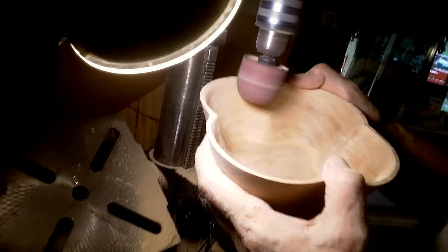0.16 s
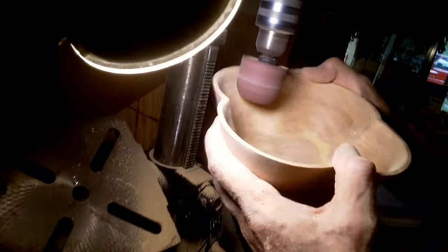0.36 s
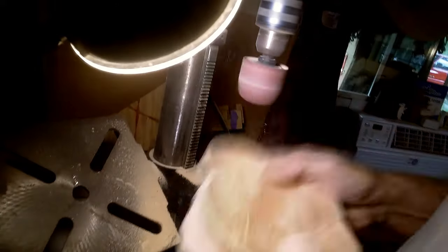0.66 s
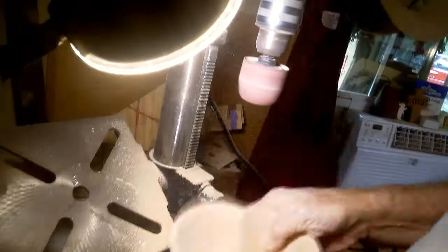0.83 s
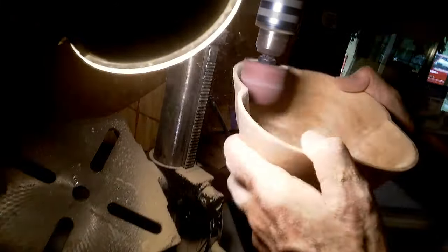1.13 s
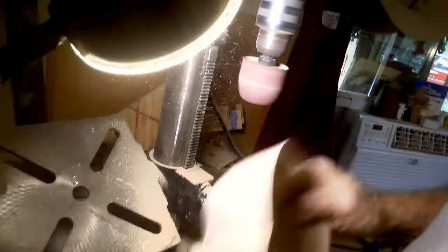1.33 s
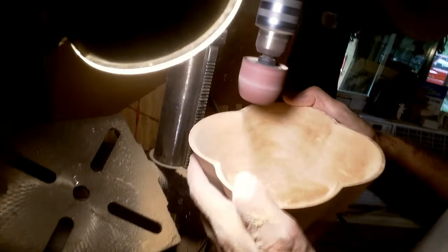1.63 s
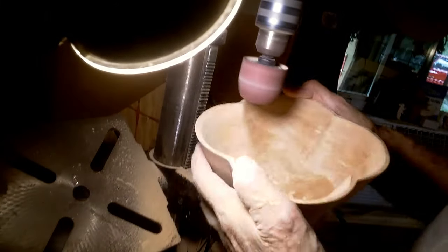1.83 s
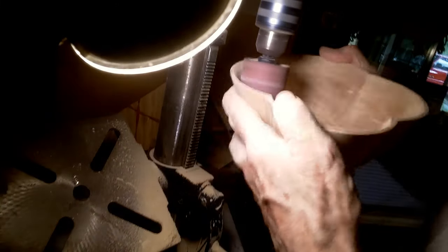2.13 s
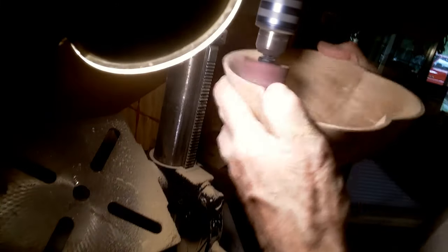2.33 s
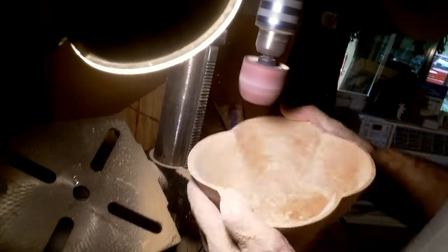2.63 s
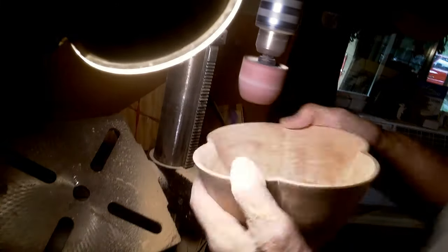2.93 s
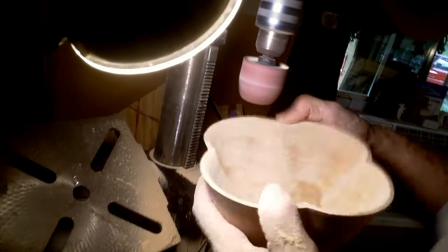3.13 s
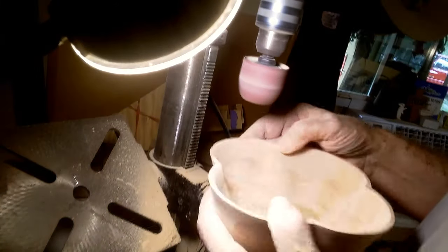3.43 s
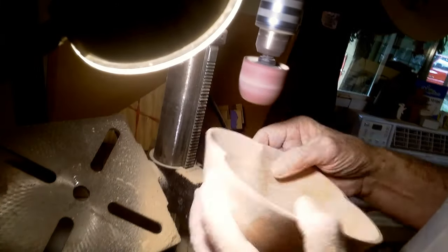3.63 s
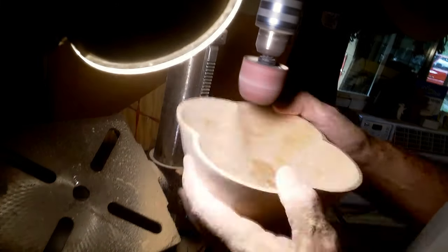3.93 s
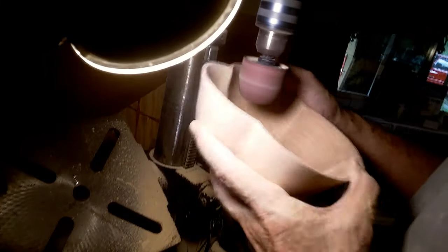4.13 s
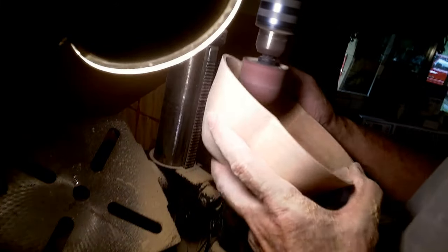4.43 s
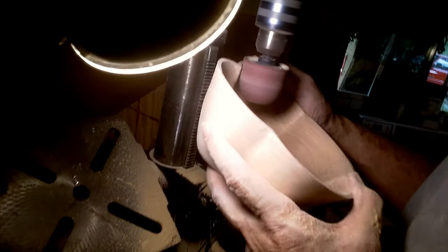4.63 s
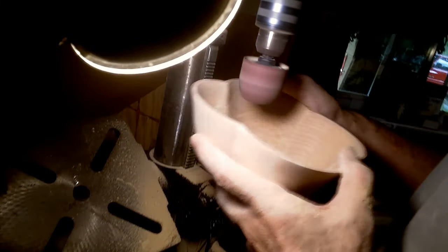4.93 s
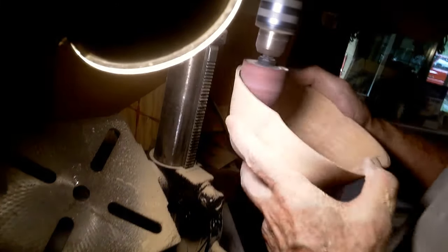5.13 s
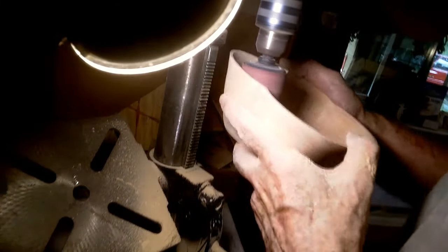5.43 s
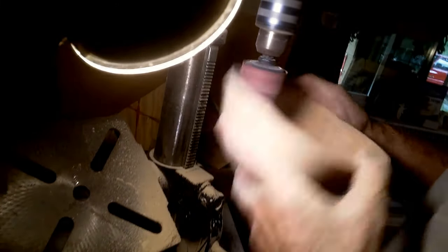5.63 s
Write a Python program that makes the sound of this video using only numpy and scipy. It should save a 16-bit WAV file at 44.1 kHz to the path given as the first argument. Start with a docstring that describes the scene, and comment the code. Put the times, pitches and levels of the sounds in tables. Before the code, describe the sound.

In a workshop, a drill press hums and rumbles close to the microphone, spinning a soft sanding drum. A wooden bowl is pressed against it three times, each stroke a fluttering, gritty hiss and scrape. After a pause with faint brushes, the bowl bounces on the drum, ticking and ringing with a thin squeal, then takes one last stroke. The machine dips in level under loud contacts and swells back between them.

```python
"""A drill press hums and rumbles from start to end, spinning a soft sanding drum near a small camera.
A wooden bowl is pressed on three times: the grit hisses and the wood scrapes, pulsing with each turn.
Around 3 s the bowl only brushes the drum. From 4.3 s it bounces, rings and gives a thin squeal as the
drum sticks and slips inside it, and one last stroke follows at 5 s. All along, the camera's limiter
turns the sound down at loud contacts and lets the machine swell back in the pauses."""
import sys
import numpy as np
from scipy import signal
from scipy.fft import rfft, irfft
from scipy.io import wavfile
from scipy.ndimage import uniform_filter1d, minimum_filter1d, map_coordinates

SR = 44100
rng = np.random.default_rng(int(sys.argv[2]) if len(sys.argv) > 2 else 0)


def wrap_up_sound(samples):
    """Save the sound to the file named by the first command line argument, as 16-bit audio."""
    columns = np.atleast_2d(samples).T
    # keep every value between -1 and 1, then stretch to whole-number steps
    tamed = np.clip(columns, -1, 1)
    steps = np.round(tamed * 32767).astype(np.int16)
    wavfile.write(sys.argv[1], SR, steps)


N = 254456
T = np.arange(N) / SR
FREQ = np.maximum(np.fft.rfftfreq(N, 1 / SR), 1)

# tones of the motor, pulleys and shaft at the usual speed: pitch_hz, level_db, wander_hz
MACHINE_TONES = [(150.8, -42, 1.77), (176.5, -41, 1.9), (269.5, -59.5, 4.07), (359, -56.5, 2.24),
                 (451, -50.5, 4.34), (479.5, -46.5, 0.99), (721.6, -64, 2.65), (1284, -68, 6.42)]
# the motor's slight drift in speed: time_s, turns_per_s
MOTOR_DRIFT = [(0, 30.12), (1.0, 30.1), (1.6, 30.44), (1.85, 30.16), (2.05, 30.0), (2.6, 30.0),
               (3.25, 30.37), (3.55, 30.16), (3.95, 30.25), (4.25, 29.88), (4.9, 30.25), (5.77, 30.1)]
# tone colour of the belt and shaft's rumble: pitch_hz, gain_db
RUMBLE_COLOUR = [(25, -21.5), (55, -8), (95, -9.5), (135, 2), (215, -6), (370, 0.5), (580, -7), (800, -16),
                 (1020, -25.5), (1300, -26), (2100, -35.5), (3000, -33), (7000, -51.5), (10500, -42),
                 (12300, -40.5), (14200, -55)]
# notes at which the metal housing and bearings ring: pitch_hz, width_hz, gain_db
HOUSING_NOTES = [(159.5, 9, 12), (470.6, 20, 10), (577, 6.8, 6.5), (718.4, 14, -0.5), (861, 12.5, -1),
                 (1188, 22, -8.5), (1630, 11, -17), (2550, 35, -11.5), (2880, 13, -10), (3110, 14, -13.5)]
# the machine's treble rises and falls a little: time_s, gain_db
TREBLE_CHANGES = [(.7, 1.5), (1.35, 1), (1.7, 0), (2.05, -0.5), (2.6, -1), (3.0, -1), (3.3, .5), (4.25, 0),
                  (4.9, -3), (5.77, -0.5)]
# long strokes of the bowl on the drum; a higher ring_balance_db means more ring and less dull scrape:
# start_s, end_s, hiss_db, scrape_db, rasp_db, chatter_depth_db, ring_balance_db, sizzle_db
SANDING_STROKES = [(-.05, 0.622, -39, -44.5, -54.5, 1, -4, 0),
                   (1.073, 1.25, -31, -44.5, -52.5, 0.7, -5, 3.5),
                   (2.03, 2.544, -44.5, -47, -57.5, 0.64, -16, 0.5),
                   (4.334, 4.567, -35, -38.5, -53.5, 2.5, 8, -6), (4.655, 4.793, -31, -37, -49, 2, 6.5, -5),
                   (5.046, 5.646, -45.5, -47.5, -58.5, 1, -2, -0.5)]
# how hard the hands press the bowl on: time_s, pressure_db
HAND_PRESSURE = [(0, -3.5), (.1, -3), (.165, 3), (.24, -0.5), (.3, -3), (.35, 2.5), (.39, -1.5), (.47, 5.5),
                 (.6, 0), (1.07, -9), (1.14, -7), (1.25, -3.5), (2.04, 5.5), (2.11, -1.5), (2.16, 5.5),
                 (2.21, 4.5), (2.265, 5.5), (2.31, 2), (2.42, 5.5), (2.47, 3), (2.55, 4.5), (4.33, -2),
                 (4.36, -4), (4.418, 2), (4.437, -5), (4.455, -1), (4.49, -1), (4.57, -7), (4.66, -6),
                 (4.74, -5), (4.79, -8), (5.05, 11.5), (5.18, 7), (5.28, 5.5), (5.335, 1.5), (5.41, 0),
                 (5.555, 4.5), (5.595, -5), (5.63, 7.5)]
# tone colour of the grit's hiss: pitch_hz, gain_db
GRIT_COLOUR = [(1000, -12), (2400, -68), (4000, -45), (5500, -8), (7500, -21), (9000, -5), (11000, 6),
               (12200, 8), (13200, 5.5), (14300, -7.5)]
# notes of the bowl while both hands muffle it: pitch_hz, width_hz, gain_db
HELD_BOWL_NOTES = [(590, 32, 18), (727, 53, 13), (890, 55, 1.5), (1167, 147, 1), (1356, 51, -2.5),
                   (1575, 50, -1.5), (1684, 28, -8), (2700, 120, -6), (3200, 1800, -13.5),
                   (4870, 780, -10.5)]
# notes of the bowl rubbed on its inner wall: pitch_hz, width_hz, gain_db
WALL_NOTES = [(890, 22, 1.5), (988, 77, 11.5), (1104, 87, 10.5), (1228, 23, 15.5), (1380, 43, 4.5),
              (1590, 64, 0), (1726, 46, 14.5), (1804, 25, 6.5), (2190, 22, 14), (2896, 82, 0.5),
              (3250, 80, -3), (3485, 47, 7), (3840, 40, 2), (5080, 86, 2.5), (5580, 70, -3),
              (6200, 660, -3)]
# bands of noise from tearing wood fibres: pitch_hz, width_hz, gain_db
FIBRE_BANDS = [(3110, 830, 4.5), (5680, 3400, 5.5)]
# the drum's edge digs in and the scrape surges: time_s, extra_scrape_db, half_length_s
EDGE_DIGS = [(0.138, 3.5, 0.049), (2.144, 3.5, 0.039)]
# brief touches of bowl and drum: start_s, length_s, hiss_db, ring_db, rim_share (0 wall, 1 rim)
BRIEF_TOUCHES = [(0.6617, 0.013, -40, -36.5, 1), (0.672, 0.012, -41.5, -31, 0.97),
                 (2.81, 0.068, -76, -64, 1), (2.862, 0.022, -56, -60, 0.91), (3.188, 0.12, -66, -62, 0.39),
                 (3.337, 0.1, -65.5, -62, 0.7), (3.388, 0.037, -70, -66, 0.34),
                 (3.507, 0.024, -60.5, -63, 0.89), (4.302, 0.021, -37, -44.5, 0.055),
                 (4.566, 0.032, -61, -54, 0), (4.63, 0.017, -57, -50, 0), (4.803, 0.031, -44.5, -44, 0),
                 (4.842, 0.015, -42, -38.5, 0), (4.857, 0.015, -36.5, -43, 0)]
# notes of the bowl caught on its rim: pitch_hz, width_hz, gain_db
RIM_NOTES = [(840, 73, 12), (1380, 72, 4), (1630, 70, -15), (1910, 1100, -0.5), (3020, 320, -3),
             (4030, 170, 4), (4700, 240, -1), (7300, 710, -8), (8200, 820, -7)]
# the bowl bounces as it meets or leaves the drum: time_s, level_db
BOUNCES = [(0.677, -35), (2.864, -50), (2.8693, -45), (2.8765, -52), (4.271, -35), (4.288, -47),
           (4.6268, -31), (4.633, -29), (4.6405, -32), (4.656, -43), (4.679, -33), (4.821, -43),
           (4.854, -40), (4.863, -37), (4.879, -38)]
# the squeal of the drum deep in the bowl: time_s, pitch_hz, level_db
SQUEAL_PATH = [(4.61, 1490, -48), (4.64, 1505, -58), (4.69, 1530, -65), (4.745, 1510, -68),
               (4.78, 1492, -51), (4.83, 1485, -52.5), (4.87, 1465, -66), (4.93, 1430, -65)]
# sound that reaches the right microphone from other directions: pitch_hz, power_share
INDIRECT_SHARE = [(60, 0.97), (160, 0.5), (260, 0.97), (500, 0.027), (1200, 0.082), (2500, 0.14),
                  (4000, 0.3), (9000, 0.98)]
# how the hollow at the right microphone shifts the low sound waves: pitch_hz, phase_radians
RIGHT_PHASE = [(40, 0), (150, -1.95), (185, -1.2), (255, 2.0), (360, .8), (480, .55), (900, 0)]
# how much the camera's body shields the right microphone: pitch_hz, loss_db
RIGHT_SHADOW = [(60, 12), (150, -0.5), (215, -0.5), (265, -1.5), (350, 16), (480, 7.5), (700, 2.5),
                (1200, 0.4), (2600, 2), (4200, 2), (6000, 3), (8000, 8), (11500, 14.5), (14000, 20)]
# narrow dips in what the camera picks up: pitch_hz, half_width_hz, gain_db
CAMERA_DIPS = [(2130, 130, -28), (4343, 150, -13), (6520, 170, -2.5)]

# sounds have two rows: what comes straight to the camera, and what comes from other directions
DIRECT_ONLY = np.array([[1], [0]])
MOTOR_HZ, BELT_HZ, DRUM_HZ = 30.15, 25.0, 28.0
BOUNCE_DECAY_S = 0.002


def undb(db):
    """Turn decibels into a number to multiply by."""
    return 10 ** (np.asarray(db) / 20)


def unit(x):
    """Scale a sound to an average (rms) level of 1."""
    return x / np.sqrt(np.mean(x ** 2))


def over_hz(points):
    """Join (pitch_hz, value) points into a curve, giving each octave equal room."""
    hz, value = np.transpose(points)
    return np.interp(np.log(FREQ), np.log(hz), value)


def resonances(notes):
    """The tone colour of an object that rings at these notes."""
    return sum(undb(db) / (1 + 1j * hz / width * (FREQ / hz - hz / FREQ)) for hz, width, db in notes)


def through(x, colour):
    """Give a sound a tone colour, then set its level to 1."""
    return unit(irfft(rfft(x) * colour, N))


def walk(rate):
    """A smooth random wobble of size 1 that changes about rate times a second."""
    return through(rng.standard_normal(N), np.exp(-(FREQ / rate) ** 2))


def grains(rate, rough_db):
    """Two rows of noise that comes in tiny uneven bursts."""
    return rng.standard_normal((2, N)) * undb(rough_db * walk(rate))


def turning(hz, start=0):
    """One swing per turn of a slightly unsteady shaft, highest just after start."""
    return np.sin(2 * np.pi * hz * (T - start) + np.pi / 8 + 0.18 * walk(9))


def drill_press():
    """The motor hums, a rumble throbs with the belt, and the bearings rattle the housing."""
    speed = np.interp(T, *np.transpose(MOTOR_DRIFT)) / MOTOR_HZ
    hum = 0
    for hz, db, wander_hz in MACHINE_TONES:
        phase = 2 * np.pi * np.cumsum(hz * speed + wander_hz * walk(13)) / SR
        hum = hum + np.sqrt(2) * undb(db + walk(32)) * np.sin(phase)
    throb = undb(0.32 * turning(BELT_HZ))
    # a fifth of each motor turn's rumble comes round again on the next
    repeat = 1 / (1 - 0.2 * np.exp(-2j * np.pi * FREQ / MOTOR_HZ))
    colour = undb(over_hz(RUMBLE_COLOUR)) * repeat
    rumble = undb(-40.5) * through(grains(rate=49, rough_db=1) * throb, colour)
    rattle = undb(-49.5) * through(grains(rate=230, rough_db=2) * throb, resonances(HOUSING_NOTES))
    treble = irfft(rfft(rumble + rattle) / (1 + (1430 / FREQ) ** 4), N)  # above 1430 Hz
    extra_treble = undb(np.interp(T, *np.transpose(TREBLE_CHANGES))) - 1
    return rumble + rattle + extra_treble * treble + hum * DIRECT_ONLY


def tearing_grit(snags_per_s=33, snag_db=2.5, snag_decay_s=0.0019):
    """Grit tears at the wood in tiny bursts, and single coarse grains snag at random moments."""
    tearing = grains(rate=1200, rough_db=1) * undb(0.59 * walk(19))
    catches = (rng.random(N) < snags_per_s / SR) * rng.exponential(size=N)
    snags = signal.lfilter([1], [1, -np.exp(-1 / (snag_decay_s * SR))], catches)
    return tearing * np.sqrt(1 + undb(snag_db) ** 2 * snags)


def bend(rows, depth, rate):
    """Let each row glide up and down at random; depth is a share of its pitch."""
    places = [np.arange(N) + np.cumsum(depth * walk(rate)) for _ in rows]
    return np.array([map_coordinates(row, [at], order=3, mode="mirror") for row, at in zip(rows, places)])


def bowl_ring():
    """Rubbing makes the wall and rim ring; the wall's notes bend as the contact point wanders."""
    wall = through(grains(rate=1040, rough_db=3), resonances(WALL_NOTES))
    rim = through(grains(rate=1040, rough_db=3), resonances(RIM_NOTES))
    return bend(wall, depth=0.008, rate=8.1), rim


def fibre_rasp():
    """Coarse grit tears the fibres: each band flickers, and the pitch shifts as the wood grain passes."""
    bands = 0
    for hz, width, db in FIBRE_BANDS:
        flicker = undb(db + 2 * walk(5))
        bands = bands + flicker * through(grains(rate=110, rough_db=4.5), resonances([(hz, width, 0)]) ** 2)
    return unit(bend(bands, depth=0.036, rate=9))


def close_echoes(db, decay_s):
    """The tone colour added by a short spray of echoes from surfaces close by."""
    spray = rng.standard_normal(N) * np.exp(-np.minimum(T / decay_s, 50))
    return 1 + undb(db) * rfft(spray) / np.sqrt(np.sum(spray ** 2))


def chatter(start, depth_db):
    """The drum spins off centre, so it bites for most of each turn and briefly lets go."""
    swing = turning(DRUM_HZ, start + 0.005)  # its high side takes a moment to come round
    lift_off = 0.6 * (swing ** 2 - 1)
    roughness = 0.45 * walk(150)
    return undb(depth_db * (swing - lift_off + roughness))


def contact(start, end, rise_s, fall_s):
    """Fade in to 1 as drum and wood meet, and back to 0 as they part."""
    return (1 + np.tanh((T - start) / rise_s)) / 2 * (1 - np.tanh((T - end) / fall_s)) / 2


def long_strokes(tearing, scrape, wall):
    """The bowl is held on the drum: hiss, scrape and rasp grow as the hands press harder."""
    grit = undb(over_hz(GRIT_COLOUR))
    sizzle = np.abs(resonances([(8900, 6700, 0.0041)])) ** 2  # a lower hiss from parts of the bowl
    dig_db = sum(db * np.exp(-((T - s) / half_s) ** 2) for s, db, half_s in EDGE_DIGS)
    press_db = np.interp(T, *np.transpose(HAND_PRESSURE))
    # the scrape follows the pressure less, and peaks early, while the drum is still digging in
    drag_db = 0.39 * np.interp(T + 0.0082, *np.transpose(HAND_PRESSURE))
    fibres = fibre_rasp()
    out = 0
    for start, end, hiss_db, scrape_db, rasp_db, chatter_db, ring_db, sizzle_db in SANDING_STROKES:
        colour = np.hypot(grit, undb(sizzle_db) * sizzle)
        # each grip turns the hollow of the bowl another way and colours the hiss anew
        hiss = through(tearing, colour * close_echoes(db=-17, decay_s=0.004))
        ring_weight = undb(ring_db) ** 2
        wood = (undb(3) * scrape + ring_weight * wall) / (1 + ring_weight)
        hissing = undb(hiss_db + press_db) * hiss
        scraping = undb(drag_db) * (undb(scrape_db + dig_db) * wood + undb(rasp_db) * fibres)
        bite = contact(start, end, rise_s=0.0051, fall_s=0.0075) * chatter(start, chatter_db)
        out = out + bite * (hissing + scraping)
    return out


def brief_touches(hiss, scrape, wall, rim):
    """The drum grazes the bowl for a moment: a puff of hiss and a ring from the wall or rim."""
    out = 0
    for start, length, hiss_db, ring_db, rim_share in BRIEF_TOUCHES:
        ring = np.sqrt(1 - rim_share) * wall + np.sqrt(rim_share) * rim
        touch = undb(hiss_db) * (hiss + undb(-23) * scrape) + undb(ring_db) * ring
        out = out + contact(start, start + length, rise_s=0.0011, fall_s=0.0045) * touch
    return out


def strike(start, decay_s):
    """A level that jumps to 1 at start and dies away."""
    return (T >= start) * np.exp(-np.minimum(np.abs(T - start) / decay_s, 50))


def bounce_ticks(hiss, wall):
    """Each bounce on the drum gives a tick of hiss, and the wall rings on a little longer."""
    tick = sum(undb(db) * strike(s, BOUNCE_DECAY_S) for s, db in BOUNCES)
    ring = sum(undb(db) * strike(s, decay_s=0.004) for s, db in BOUNCES)
    return tick * hiss + undb(-19.5) * ring * wall


def grit_spits():
    """The grit's tips spit at each bounce: too high for the camera to keep, but it trips the limiter."""
    bursts = sum(strike(s, BOUNCE_DECAY_S) for s, _ in BOUNCES)
    return undb(-35) * bursts * through(rng.standard_normal(N), FREQ > 15500)


def squeal():
    """The drum sticks and slips on the inner wall and draws a thin gliding note from it."""
    times, hz, db = np.transpose(SQUEAL_PATH)
    phase = 2 * np.pi * np.cumsum(np.interp(T, times, hz) + 5 * walk(66)) / SR
    level = np.interp(T, times, undb(db), left=0, right=0)
    return np.sqrt(2) * level * np.sin(phase) * DIRECT_ONLY


def microphones(sound, right_delay_s=0.000461):
    """The left gets the direct sound; the right gets a later, shielded mix with its wave upside down."""
    direct, indirect = rfft(sound)
    share = over_hz(INDIRECT_SHARE)
    mix = np.sqrt(1 - share) * direct + np.sqrt(share) * indirect
    delay = np.exp(-1j * (2 * np.pi * FREQ * right_delay_s + over_hz(RIGHT_PHASE)))
    right = -delay * undb(-over_hz(RIGHT_SHADOW)) * mix
    return irfft(np.array([direct, right]), N)


def scene():
    """The machine and the sanded bowl, as they reach the two microphones."""
    machine = drill_press()
    tearing = tearing_grit()
    hiss = through(tearing, undb(over_hz(GRIT_COLOUR)))
    scrape = through(tearing, resonances(HELD_BOWL_NOTES))
    wall, rim = bowl_ring()
    sanding = long_strokes(tearing, scrape, wall) + brief_touches(hiss, scrape, wall, rim)
    return microphones(machine + sanding + bounce_ticks(hiss, wall) + grit_spits() + squeal())


def limiter(x, threshold_db, slope, hold_s, release_db_per_s, above_hz):
    """An automatic volume control: it drops at once on loud treble, waits, then climbs back steadily."""
    treble = signal.sosfilt(signal.butter(4, above_hz, "high", fs=SR, output="sos"), x)
    power = np.maximum(uniform_filter1d(treble ** 2, size=220), 0) + 1e-14
    wanted_cut_db = slope * np.maximum(10 * np.log10(power) - threshold_db, 0)
    half_hold = int(hold_s * SR / 2)
    held_db = -minimum_filter1d(-wanted_cut_db, 2 * half_hold + 1, origin=half_hold)
    cut_db = np.maximum.accumulate(held_db + release_db_per_s * T) - release_db_per_s * T
    return undb(-uniform_filter1d(cut_db, size=200))


def record(dry):
    """The camera weakens a few narrow bands, limits both sides together and cuts all above 14300 Hz."""
    dips_db = sum(db * np.exp(-((FREQ - hz) / half_hz) ** 2) for hz, half_hz, db in CAMERA_DIPS)
    heard = irfft(rfft(dry) * undb(dips_db), N)
    gain = limiter(heard[0], threshold_db=-59, slope=0.49, hold_s=0.076,
                   release_db_per_s=43.5, above_hz=6600)
    return signal.sosfilt(signal.ellip(10, 0.2, 80, 14300, fs=SR, output="sos"), heard * gain)


dry = scene()
out = record(dry)
wrap_up_sound(out)
```